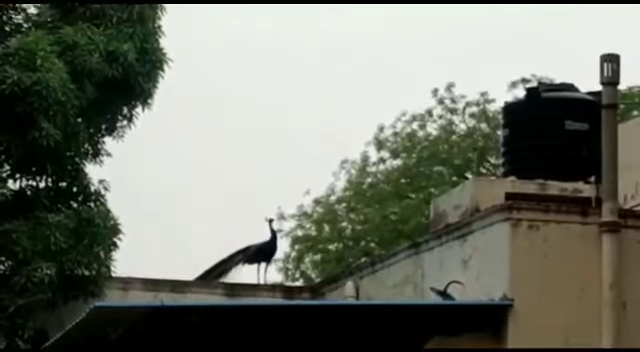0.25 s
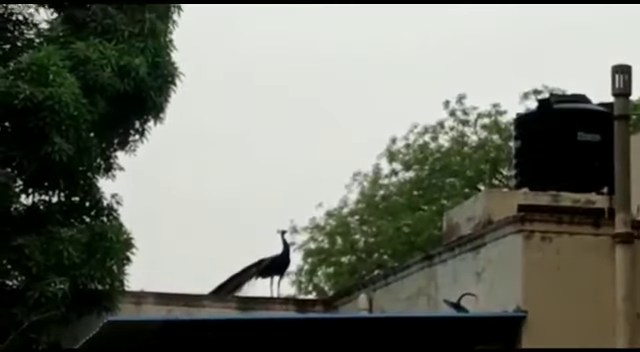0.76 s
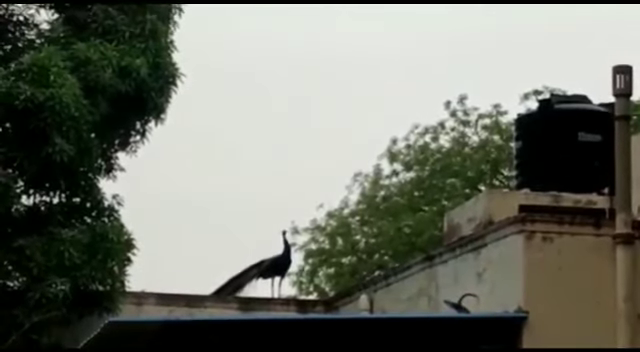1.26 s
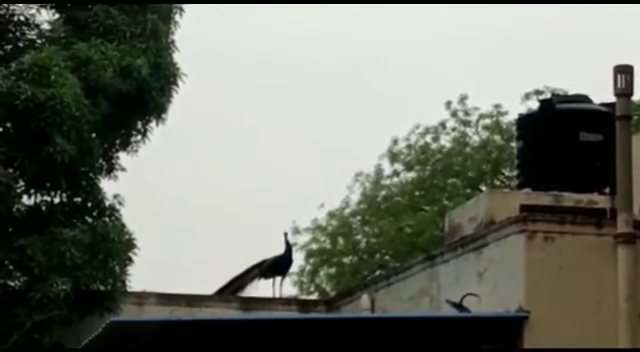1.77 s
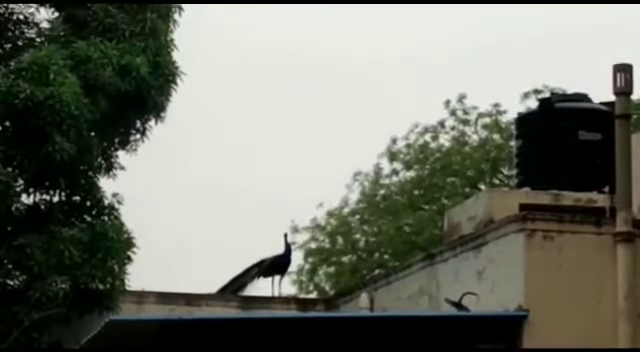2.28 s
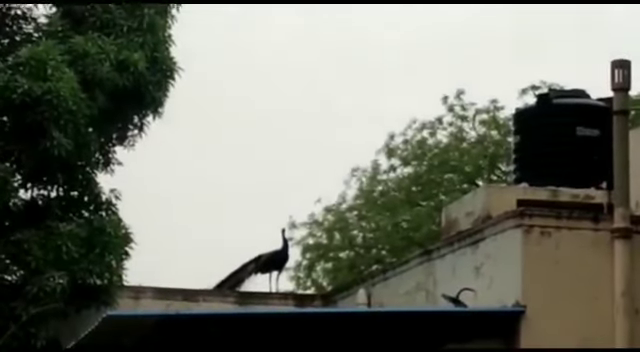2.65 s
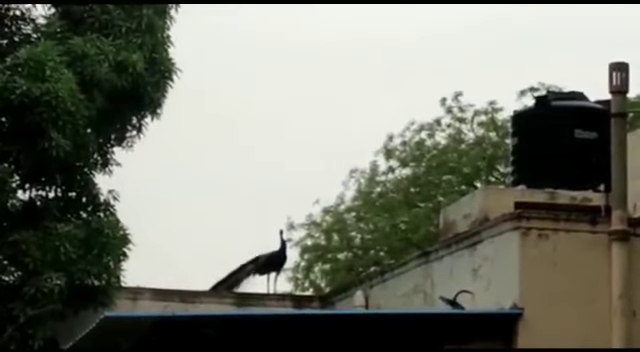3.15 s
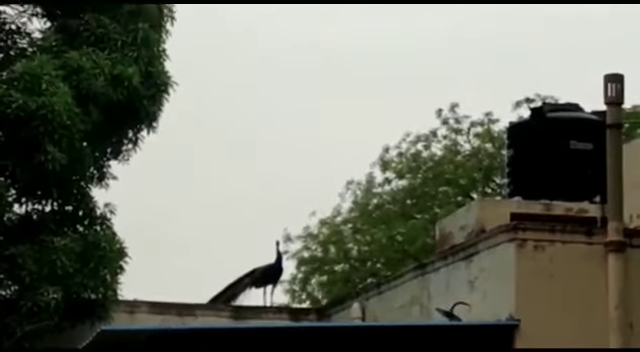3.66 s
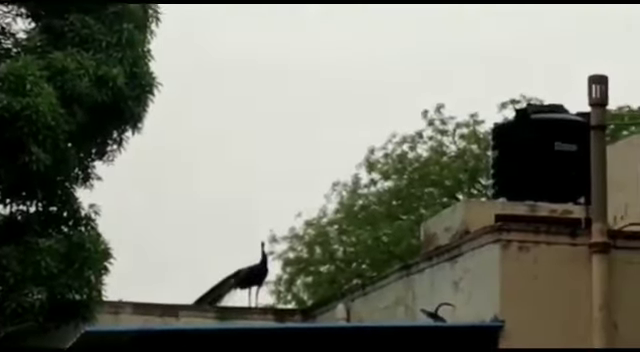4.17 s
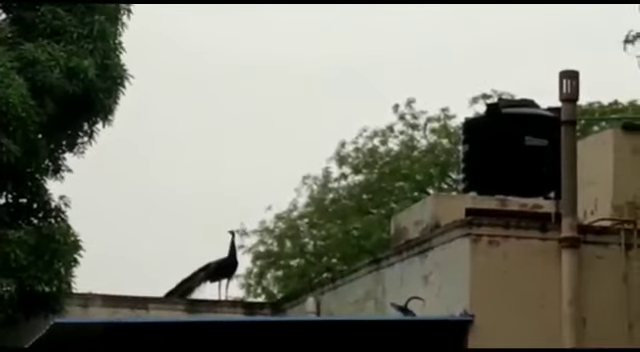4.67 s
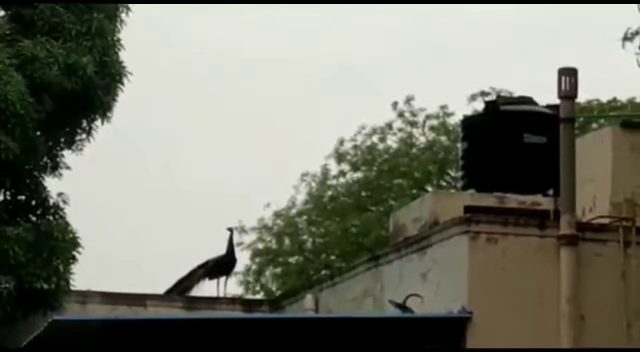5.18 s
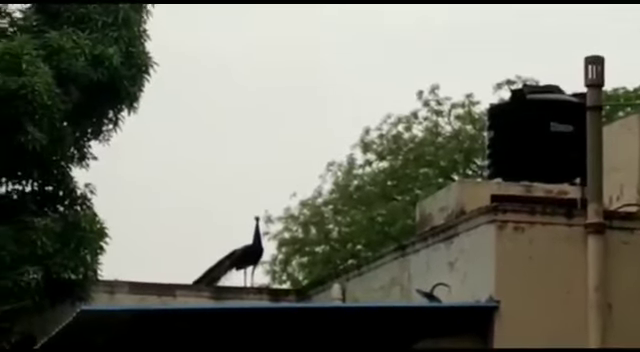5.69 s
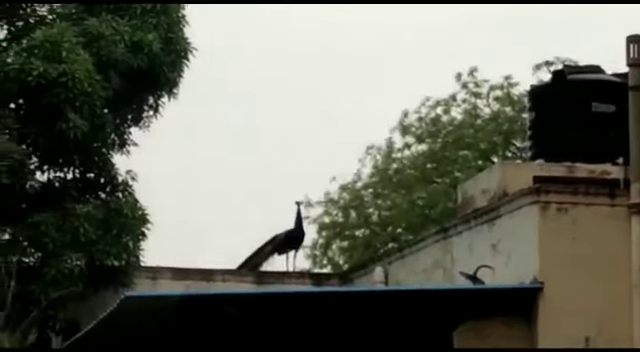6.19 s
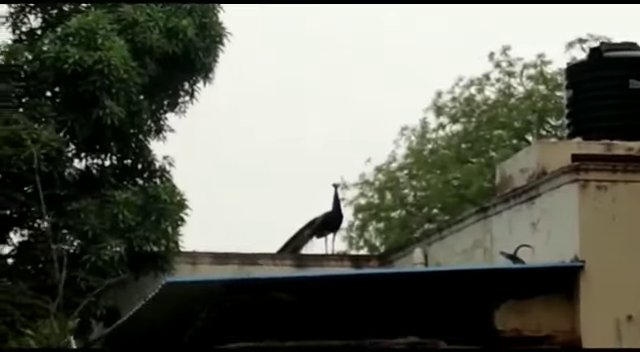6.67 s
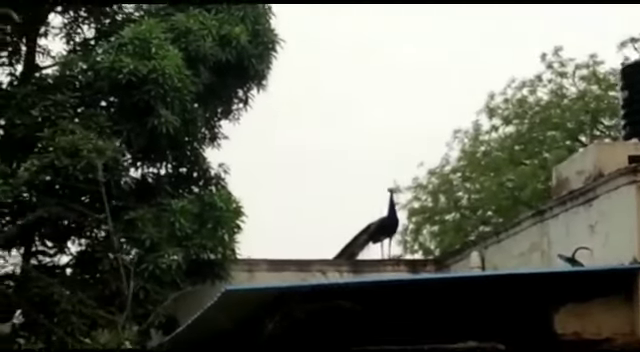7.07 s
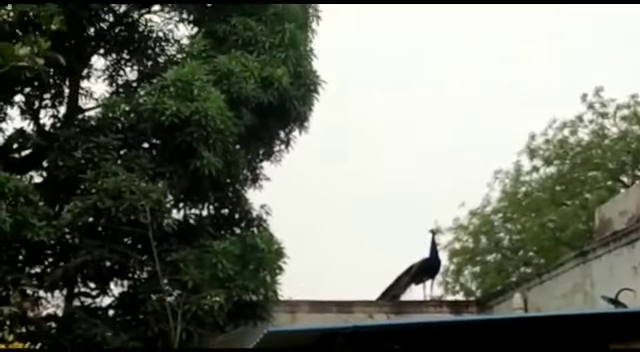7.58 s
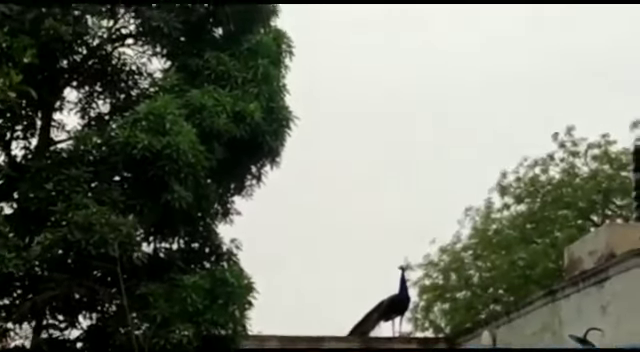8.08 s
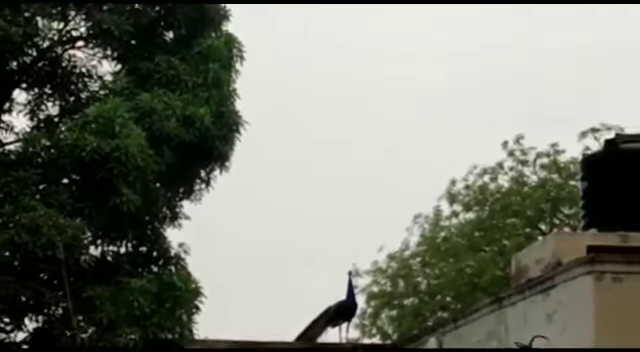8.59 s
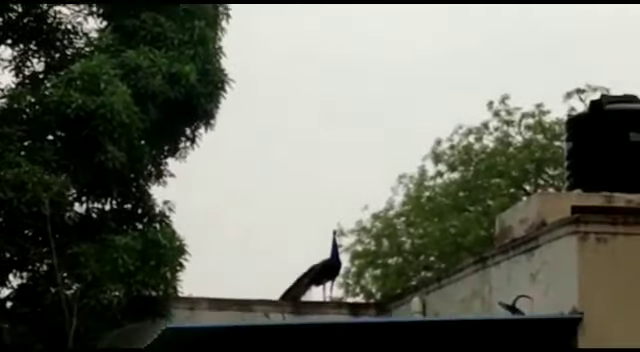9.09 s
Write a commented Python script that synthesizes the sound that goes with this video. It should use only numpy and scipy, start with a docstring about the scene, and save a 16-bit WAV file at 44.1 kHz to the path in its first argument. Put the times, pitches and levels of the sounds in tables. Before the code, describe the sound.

Nearby peafowl call in a walled yard with trees, and a peacock gives two loud arching cries, hoarse at the edges and brassy at their height. A parakeet-like bird squawks briefly in between. After about three seconds it grows much quieter: small birds chirp and whistle while distant peafowl answer faintly. The calls echo lightly off the walls, over a faint hiss and wavering hum.

```python
"""A yard with walls and trees. A peacock on a roof gives two loud arching cries: syrinx harmonics shaped
by the throat, hoarse when slack, brassy with effort. Other peafowl answer from near and far.
A parakeet-like bird squawks in between; small birds chirp and whistle in nearly pure tones.
Walls and foliage throw the calls back. Under them lie a faint hiss and a wavering hum,
with the hissy echo of a squawk dying away at the start, then soft rustles."""
import sys
import numpy as np
from scipy import signal
from scipy.fft import rfft, irfft, next_fast_len
from scipy.io import wavfile
from scipy.ndimage import uniform_filter1d

SR = 44100
rng = np.random.default_rng(int(sys.argv[2]) if len(sys.argv) > 2 else 0)


def transcribe(u):
    """Save the signal u as a 16-bit wav file named by the first command-line argument.

    u: samples, shape (n,) or (channels, n), limited to [-1, 1]; the rate is SR.
    q: integer samples, one column per channel.
    """
    v = np.clip(np.atleast_2d(u).T, -1, 1)
    q = np.round(v * 32767).astype(np.int16)
    wavfile.write(sys.argv[1], SR, q)


N = 411894
TIME = np.arange(N) / SR
CUTOFF_HZ = 15900

# Swell of the distant bird chorus. Each row: time in seconds, relative level in dB.
CHORUS_SWELL = [(3.6, -40.5), (3.76, -45.5), (4.78, -42), (5.15, -49.5), (6.08, -40.5), (7.64, -46),
                (8.8, -53), (9.34, -47.5)]
# Balance of hiss and echoes. Each row: frequency in Hz, left minus right in dB.
DIFFUSE_BALANCE = [(200, 1), (1400, -1.5), (2400, -5.5), (4200, -2), (6000, -9.5), (8300, -4.5), (10000, 0)]


def from_db(db):
    """Decibels to gain."""
    return 10 ** (np.asarray(db) / 20)


def unit_rms(x):
    """Scale to unit power."""
    return x / np.sqrt(np.mean(x ** 2) + 1e-20)


def at_hz(points, hz):
    """Read a table on a log-frequency axis."""
    points = np.array(points)
    return np.interp(np.log(np.maximum(hz, 1)), np.log(points[:, 0]), points[:, 1])


def pan(side_db):
    """Left and right gains for a level difference."""
    gains = from_db(np.array([[.5], [-.5]]) * side_db)
    return gains / np.sqrt(np.mean(gains ** 2, axis=0))


def colour(x, gain_at):
    """Filter by a frequency-dependent gain."""
    size = next_fast_len(x.shape[-1] + SR // 10)
    hz = np.arange(size // 2 + 1) * SR / size
    return irfft(rfft(x, size) * gain_at(hz), size)[..., :x.shape[-1]]


def drift(rate_hz, size):
    """Smooth random curve, spread about 1."""
    steps = np.arange(size) * rate_hz / SR
    return np.interp(steps, np.arange(size // 2 + 2), rng.standard_normal(size // 2 + 2))


def add(track, start_s, sound):
    """Mix a sound into a track."""
    i = round(start_s * SR)
    sound, i = sound[max(0, -i):], max(0, i)
    track[i:i + len(sound)] += sound[:max(0, N - i)]


def fade(size, edge_s):
    """Gate with soft ends."""
    i = np.arange(size)
    return np.sin(np.pi / 2 * np.minimum(1, np.minimum(i, size - i) / (edge_s * SR)))


def arch(length_s, start_hz, middle_hz, end_hz):
    """Pitch and swell of a note bending through three pitches."""
    u = np.linspace(0, 1, round(length_s * SR))
    pitch_hz = np.polyval(np.polyfit([0, .5, 1], [start_hz, middle_hz, end_hz], 2), u)
    return pitch_hz, np.sqrt(2 * np.abs(np.sin(np.pi * u)))


def mono_noise(spectrum, size):
    """Unit-power noise shaped by rows of Hz, dB."""
    return unit_rms(colour(rng.standard_normal(size), lambda hz: from_db(at_hz(spectrum, hz))))


def stereo_noise(gain_at):
    """Unit-power noise, alike in both ears in bass and top, diffuse in the middle."""
    # Each row: frequency in Hz, left-right coherence.
    coherence = [(100, 1), (300, 0.65), (640, 0.47), (1400, 0), (3100, 0), (6800, 0.79), (11000, 0.93)]
    mid, side = rng.standard_normal((2, N))
    mid = colour(mid, lambda hz: gain_at(hz) * np.sqrt(1 + at_hz(coherence, hz)))
    side = colour(side, lambda hz: gain_at(hz) * np.sqrt(1 - at_hz(coherence, hz)))
    return unit_rms(mid + side * [[1], [-1]])


def noise_band(centre_hz, width_hz):
    """Stereo noise in one resonance, falling steeply from an octave below it."""
    def resonance(hz):
        return np.minimum(1, 2 * hz / centre_hz) ** 2 / (1 + 2 * ((hz - centre_hz) / width_hz) ** 2)
    return stereo_noise(resonance)


def yard(x, scatter_db=-1.5, build_s=.00025):
    """A few wall echoes and a tail scattered by leaves."""
    # Each row: delay in seconds, left gain in dB, right gain in dB.
    walls = [(.013, -20, -17), (.029, -18, -14), (.047, -19, -15), (.071, -22, -18)]
    # Each row: frequency in Hz, time to fall 60 dB in seconds.
    t60 = [(500, 1.2), (1300, 0.94), (2300, 1.26), (5000, 1.3), (9000, 1), (15000, 1.0)]
    # Each row: frequency in Hz, gain in dB.
    echo_colour = [(500, 15), (1200, 12.5), (2400, 9), (4500, 6.5), (8000, 8), (10500, 7), (15000, -1)]
    t, edges_hz = TIME[:SR], np.geomspace(250, 16000, num=9)
    response = np.zeros((2, SR))
    for low, high in zip(edges_hz, edges_hz[1:]):
        bandpass = signal.butter(2, [low, high], "band", fs=SR, output="sos")
        band = signal.sosfilt(bandpass, rng.standard_normal((2, SR)))
        decay = np.exp(-np.log(1000) * t / at_hz(t60, np.sqrt(low * high))) * (1 - np.exp(-t / build_s))
        response += from_db(scatter_db) * band * decay / np.linalg.norm(decay)
    for delay_s, *sides_db in walls:
        response[[0, 1], round(delay_s * SR) + rng.integers(0, 20, 2)] += from_db(sides_db)
    echoes = signal.fftconvolve(x[None], response, axes=1)[:, :N]
    return colour(echoes, lambda hz: from_db(at_hz(echo_colour, hz)) * pan(at_hz(DIFFUSE_BALANCE, hz)))


def heard(x, direct_db, echo_db, side_db, left_lag_s=0):
    """A source by its straight path and by way of the yard."""
    # Each row: frequency in Hz, left minus right in dB.
    direct_balance = [(700, 0.5), (1350, 53), (2100, -0.5), (3400, -25.5), (5000, -2), (8300, -5),
                      (10500, 4.5), (13000, 8)]
    ears = np.array([np.interp(TIME - left_lag_s, TIME, x), x]) if left_lag_s else x
    direct = colour(ears, lambda hz: pan(at_hz(direct_balance, hz) + side_db))
    return from_db(direct_db) * direct + from_db(echo_db) * yard(x)


def background(air_db=-53.5, hum_hz=208.4, hum_db=-71, waver_db=2.2, swell_share=.43):
    """Outdoor hiss and hum; the treble swells and sinks with the far chorus."""
    # Each row: frequency in Hz, relative level in dB.
    air_spectrum = [(24, -58), (40, -36), (123, -20), (198, -5), (296, -9.5), (539, -15.5), (912, -14.5),
                    (1790, -7.5), (2480, -3), (3110, -12), (3800, -8.5), (5530, -10), (6420, -5.5),
                    (11100, -22.5), (15800, -23)]
    # Bands of hum and chorus. Each row: centre in Hz, width in Hz, level in dB, left minus right in dB.
    drones = [(201.5, 18, -71.5, -1.5), (573, 130, -66.5, 0.5), (2520, 195, -54.5, -9.5),
              (3820, 140, -62.5, -15), (5134, 240, -59.5, -5), (6434, 35, -63, -7)]
    air = stereo_noise(lambda hz: from_db(at_hz(air_spectrum, hz)) * pan(at_hz(DIFFUSE_BALANCE, hz)))
    out = from_db(air_db) * air
    for centre_hz, width_hz, db, side_db in drones:
        out += noise_band(centre_hz, width_hz) * pan(side_db) * from_db(db + waver_db * drift(11, N))
    out += from_db(hum_db) * np.sqrt(2) * np.sin(2 * np.pi * hum_hz * TIME)
    times_s, chorus_db = np.transpose(CHORUS_SWELL)
    swell = from_db(swell_share * np.interp(TIME, times_s, chorus_db - chorus_db.mean()))
    treble = colour(out, lambda hz: from_db(at_hz([(900, -15), (1900, -3), (9000, 4), (12000, -19)], hz)))
    return out + (swell - 1) * treble


def squawk_echo_and_rustles():
    """The hissy echo of a squawk dying away at the start, then soft rustles."""
    # Each row: start in seconds, length in seconds, centre in Hz, width in Hz, level in dB.
    swells = [(-.2, 0.45, 4260, 3300, -32.5), (0.52, 0.59, 342, 110, -61.5),
              (1.294, 0.41, 317.4, 123.5, -70.5), (6.67, 0.44, 404, 91.5, -68),
              (6.757, 0.26, 7650, 3500, -61.5)]   # the first row is the echo
    out = np.zeros((2, N))
    for start_s, length_s, centre_hz, width_hz, db in swells:
        u = np.clip((TIME - start_s) / length_s, 0, 1)
        out += noise_band(centre_hz, width_hz) * from_db(db) * np.sqrt(2 * np.abs(np.sin(np.pi * u)))
    return out


def pipe(pitch_hz, flutter, overtone_db=-27.5, flutter_hz=1200):
    """A small bird's nearly pure tone with fast pitch flutter."""
    phase = 2 * np.pi * np.cumsum(pitch_hz * (1 + flutter * drift(flutter_hz, len(pitch_hz)))) / SR
    return np.sqrt(2) * (np.sin(phase) + from_db(overtone_db) * np.sin(2 * phase))


def chatter(notes_per_s=19, base_db=-63, spread_db=12):
    """Distant small birds: brief scratchy glides at random, louder when the chorus swells."""
    out = np.zeros(N)
    times_s, chorus_db = np.transpose(CHORUS_SWELL)
    for when, height, span, bend, loud in rng.random((round(notes_per_s * N / SR), 5)):
        start_s, hz = when * N / SR, 2250 * 2 ** (1.15 * height)
        pitch_hz, swell = arch(.0192 + .0407 * span, hz, hz * (.88 + .2 * bend), hz * (.9 + .415 * bend))
        db = base_db + spread_db * loud + .5 * np.interp(start_s, times_s, chorus_db - chorus_db.mean())
        add(out, start_s, from_db(db) * swell * pipe(pitch_hz, flutter=.035))
    return out


def whistler(gain_db=3.5):
    """One low whistle that holds, lifts and drops."""
    # Each row: time in seconds, pitch in Hz, relative level in dB.
    contour = [(5.096, 1383, -66), (5.249, 1341, -68), (5.327, 1440, -56), (5.401, 1520, -68),
               (5.46, 1205, -57.5), (5.529, 1008, -69)]
    out = np.zeros(N)
    times_s, hz, db = np.transpose(contour)
    t = np.arange(times_s[0], times_s[-1], 1 / SR)
    tone = pipe(np.interp(t, times_s, hz), flutter=.003)
    add(out, times_s[0], from_db(np.interp(t, times_s, db) + gain_db) * tone * fade(len(t), .023))
    return out


def small_birds(gain_db=3.5, fall_db=4, quaver_db=4, quaver_hz=130):
    """Gliding chirps that speak quickly, quaver and die away."""
    # Each row: start in seconds, length in seconds, four successive pitches in Hz, relative level in dB.
    chirps = [(0.076, 0.053, 3450, 3300, 3050, 2840, -40), (0.324, 0.098, 3300, 3014, 2790, 2740, -42.5),
              (0.58, .08, 3070, 2940, 2727, 2660, -44), (.648, 0.043, 3970, 3580, 3260, 2900, -47),
              (3.046, 0.045, 2930, 2976, 2932, 3290, -54), (3.278, 0.14, 6260, 6080, 6150, 6320, -55.5),
              (3.668, 0.088, 6200, 6670, 6780, 6830, -54), (3.9, 0.11, 6340, 5670, 5150, 5030, -56),
              (3.959, 0.079, 5000, 4740, 4300, 4130, -46.5), (4.425, 0.053, 3810, 3684, 3740, 3680, -51),
              (4.509, 0.043, 4140, 4310, 4060, 4220, -47.5), (4.581, 0.069, 4500, 4150, 3800, 3600, -56),
              (4.744, 0.096, 4600, 4250, 4160, 4240, -51), (4.801, 0.051, 4140, 4030, 3790, 3390, -48),
              (5.56, 0.038, 3700, 3900, 3850, 3670, -57.5), (5.715, 0.054, 4000, 4090, 3960, 3890, -53.5),
              (5.77, 0.063, 2670, 2400, 2110, 1880, -57), (6.004, 0.066, 4700, 4480, 4200, 4060, -49.5),
              (6.065, 0.06, 3940, 3870, 3700, 3150, -49.5), (6.25, 0.045, 4730, 4420, 4150, 3940, -52),
              (6.24, 0.081, 2384, 2200, 1990, 1910, -66), (6.326, 0.062, 3556, 3694, 3770, 2860, -48.5),
              (6.41, 0.029, 2490, 2573, 2620, 2800, -48.5), (6.58, .06, 2296, 2480, 2600, 2550, -59.5),
              (6.762, 0.057, 4270, 4480, 4370, 2830, -48), (6.835, 0.039, 2633, 2560, 2530, 2430, -52),
              (7.085, 0.029, 2210, 2360, 2585, 2600, -53), (7.109, .018, 2540, 2650, 2700, 2780, -47),
              (7.255, 0.051, 2360, 2490, 2300, 2020, -58), (7.272, 0.035, 4880, 4550, 4220, 3790, -49.5),
              (7.412, 0.045, 2630, 2655, 2660, 2660, -48), (7.515, 0.047, 2400, 2190, 2180, 1950, -57.5),
              (7.598, 0.054, 10240, 9850, 10150, 9700, -55), (7.616, 0.052, 4000, 3900, 3740, 3480, -57.5),
              (7.651, 0.09, 2395, 2477, 2517, 2530, -52.5), (7.785, 0.037, 2070, 2214, 2210, 2180, -56),
              (7.924, 0.034, 4000, 3840, 3750, 3570, -56.5), (7.966, 0.032, 3240, 3195, 3320, 3240, -52.5),
              (8.018, 0.03, 3100, 3090, 3130, 3080, -54.5), (8.069, .06, 3150, 3220, 3140, 3050, -62),
              (8.385, 0.086, 4700, 4260, 4210, 3670, -49.5), (8.475, 0.026, 4170, 4020, 3550, 3100, -47),
              (8.567, 0.094, 4400, 4200, 4080, 4100, -64), (8.75, 0.09, 1890, 1875, 1976, 1990, -64.5),
              (8.84, 0.096, 3850, 3690, 3530, 3510, -55.5), (8.893, 0.15, 3930, 4230, 4600, 5240, -57.5),
              (9.119, 0.072, 5140, 4720, 4220, 3780, -48.5), (9.201, 0.05, 3050, 3060, 3210, 3370, -52.5),
              (9.243, 0.044, 3320, 3680, 3780, 3960, -49)]
    out = np.zeros(N)
    for start_s, length_s, *bends_hz, db in chirps:
        u = np.linspace(0, 1, round(length_s * SR))
        pitch_hz = uniform_filter1d(np.interp(u, np.linspace(0, 1, num=4), bends_hz), size=250)
        shape_db = fall_db * (.5 - u) + quaver_db * drift(quaver_hz, len(u))
        envelope = from_db(db + gain_db + shape_db) * fade(len(u), edge_s=.005)
        add(out, start_s, envelope * pipe(pitch_hz, flutter=.02))
    return out


def syrinx(pitch_hz, throat, jitter, jitter_hz, harmonics, lift_db):
    """Harmonics of a slightly unsteady membrane, shaped by the throat and by lift_db(hz)."""
    phase = 2 * np.pi * np.cumsum(pitch_hz * (1 + jitter * drift(jitter_hz, len(pitch_hz)))) / SR
    out = np.zeros(len(pitch_hz))
    for k in range(1, harmonics + 1):
        hz = k * pitch_hz
        gain = (hz < CUTOFF_HZ) * from_db(at_hz(throat, hz) + lift_db(hz))
        out += gain * np.sin(k * phase + rng.uniform(0, 2 * np.pi))
    return np.sqrt(2) * out


def squawks(gain_db=13.5, hiss_db=-8, harshen_db_per_oct=10.5, rattle_db=3, rattle_hz=140):
    """Each squawk shoots up, sags and drops off, growing harsher; held ones rattle and hiss most."""
    # Each row: start in seconds, length in seconds, top pitch in Hz, relative level in dB,
    # hold from 0 to 1, brightness in dB per octave.
    calls = [(0.13, 0.11, 2322, -42, 0.8, 5.5), (0.419, 0.105, 2337, -42, 0.98, 5.5),
             (1.192, 0.093, 2312, -44, 0.2, -2), (1.451, 0.094, 2263, -44.5, 0.35, 1.5),
             (1.734, 0.083, 2260, -47.5, 0.13, 2), (1.998, 0.092, 2180, -48.5, 0.27, 0.5),
             (3.132, 0.11, 2292, -56.5, 0, 0.5), (3.417, 0.11, 2247, -54.5, 0.03, 2.5),
             (4.05, 0.12, 2290, -64.5, 0.15, -1)]
    # Each row: share of the length, then short and held pitch as shares of the top.
    contour = [(0, .58, .65), (.16, .91, 0.84), (0.281, 1.02, 1.02), (.4, .92, 1), (0.538, 0.8, .97),
               (.7, .68, .9), (.87, .65, .8), (0.998, 0.43, .62)]
    # Spectra of voice and hiss. Each row: frequency in Hz, gain in dB.
    throat = [(1400, 0), (2200, 8), (3000, 8), (4200, 13), (5500, 5.5), (7000, 3.5), (8800, -3),
              (10000, -14), (15000, -28)]
    hiss_spectrum = [(300, -52), (1500, -12), (2600, -1), (4300, 4), (8500, -20), (10500, -9), (15500, -16)]
    out = np.zeros(N)
    when, short, held = np.transpose(contour)
    for start_s, length_s, top_hz, db, hold, brightness in calls:
        u = np.linspace(0, 1, round(length_s * SR))
        pitch_hz = top_hz * uniform_filter1d(np.interp(u, when, short + hold * (held - short)), size=500)
        jitter = np.interp(u * u, [0, 1], [.016, .026]) * (1 + hold)
        tilt_db_per_oct = brightness + harshen_db_per_oct * (u - .5)
        voice = syrinx(pitch_hz, throat, jitter, jitter_hz=1500, harmonics=8,
                       lift_db=lambda hz: tilt_db_per_oct * np.log2(np.minimum(hz, 9000) / 4000))
        hiss = max(hold, .19) * from_db(hiss_db) * np.sqrt(2 * u) * mono_noise(hiss_spectrum, len(u))
        rattle = from_db(rattle_db * np.sqrt(hold) * drift(rattle_hz, len(u)))
        swell = np.sqrt(np.minimum(1, u / .35)) * fade(len(u), edge_s=.012)
        add(out, start_s, from_db(db + gain_db) * swell * rattle * (unit_rms(voice) + hiss))
    return out


def peafowl(calls, throat, start_share, end_share, jitter, harmonics, gain_db=-1, mellow_db_per_oct=9):
    """Arching notes that start and end below their top pitch, brassy only at their height."""
    out = np.zeros(N)
    for start_s, length_s, top_hz, db in calls:
        pitch_hz, swell = arch(length_s, start_share * top_hz, top_hz, end_share * top_hz)
        tilt_db_per_oct = mellow_db_per_oct * (swell ** 2 - 2)
        voice = syrinx(pitch_hz, throat, jitter, jitter_hz=397.3, harmonics=harmonics,
                       lift_db=lambda hz: tilt_db_per_oct * np.log2(np.maximum(hz / 3000, 1)))
        add(out, start_s, from_db(db + gain_db) * swell * voice)
    return out


def far_peafowl():
    """Faint, dull answers from far away."""
    # Each row: start in seconds, length in seconds, top pitch in Hz, relative level in dB.
    calls = [(3.55, 0.39, 639, -78), (4.25, 0.24, 575, -73.5), (4.9, 0.21, 564, -74.5),
             (5.26, 0.45, 579.3, -70), (5.85, 0.41, 546, -76.5), (6.6, 0.43, 637, -73),
             (6.97, .41, 615, -73.5), (7.63, 0.24, 568, -74.5), (8.1, 0.43, 801, -73.5),
             (8.66, 0.44, 614, -75.5)]
    # Each row: frequency in Hz, gain in dB.
    throat = [(500, 0), (800, 0), (1100, -12), (1650, -5), (2400, -2), (3200, -12)]
    return peafowl(calls, throat, start_share=.92, end_share=.77, jitter=.0021, harmonics=5)


def rival_peafowl():
    """Bright calls from rivals close by."""
    # Each row: start in seconds, length in seconds, top pitch in Hz, relative level in dB.
    calls = [(-.3, 0.43, 726, -35.5), (.25, 0.4, 740, -35.5), (.72, .62, 747, -36),
             (1.55, 0.49, 741.2, -33)]
    # Each row: frequency in Hz, gain in dB.
    throat = [(700, -22.5), (1450, -22), (2000, -13.5), (2230, -3), (2900, -13.5), (4400, -17), (7000, -17),
              (12000, -28), (15500, -33)]
    return peafowl(calls, throat, start_share=.81, end_share=.9, jitter=.004, harmonics=21)


def roof_db(hz, delay_s=.001575, strength=.6):
    """The roof's reflection makes gliding harmonics swell and fade; the treble is scattered instead."""
    reflected = strength * np.interp(hz, [6000, 10000], [1, 0])
    return 20 * np.log10(np.abs(1 + reflected * np.exp(-2j * np.pi * hz * delay_s)))


def peacock(brassy_effort=.55, slack_db_per_oct=-13, wobble=.003, waver_db=1.5, waver_hz=60):
    """Effort builds and ebbs: each cry opens from dull and hoarse to clean and brassy, then darkens."""
    # Each row: time in seconds, pitch in Hz, voice gain in dB, effort from 0 to 1, hiss level in dB.
    first_cry = [(.71, 770, -35, 0.13, -46), (.755, 813, -33, .27, -41.5), (.805, 863, -39, 0, -43.5),
                 (0.852, 919, -28, 0.52, -37.5), (.9, 911, -26.5, .38, -35), (.95, 898.7, -28, 0.36, -37),
                 (1.002, 873, -26, 0.49, -38), (1.05, 866, -28, 0.6, -43), (1.101, 839, -34.5, .72, -31),
                 (1.15, 819.4, -29.5, 0.52, -33.5), (1.2, 786.5, -31, 0.2, -30),
                 (1.24, 769.6, -31.5, 0.19, -31.5), (1.292, 744, -36, 0.3, -38),
                 (1.38, 697, -47, 0.08, -52)]
    second_cry = [(2.074, 545, -24, 0, -64), (2.1, 558, -25, 0, -55), (2.139, 593, -22.5, 0, -43.5),
                  (2.18, 625.6, -24, 0.3, -38), (2.21, 644, -21.5, 0.42, -46),
                  (2.255, 659.4, -25.5, 0.56, -43), (2.3, 673, -25, 0.7, -50),
                  (2.357, 683.3, -26, 0.78, -58), (2.44, 686, -27, 0.92, -63),
                  (2.518, 683.3, -24.5, 0.8, -58), (2.56, 672.7, -25.5, .66, -40),
                  (2.6, 649, -21.5, 0.34, -40), (2.64, 623.7, -23.5, 0.41, -43),
                  (2.69, 601.5, -22, 0.24, -38), (2.74, 575.4, -22, 0.39, -40.5),
                  (2.775, 537.4, -28, 0.092, -40), (2.809, 512, -39, 0.089, -41.5), (2.9, 480, -60, 0, -47)]
    # Each row: effort from 0 to 1, factor on jitter, wobble and waver.
    hoarseness = [(0, 1.6), (.35, 1.2), (.55, .45), (.7, .15), (.9, .04)]
    # Spectra. Each row: frequency in Hz, gain in dB.
    throat = [(550, -27), (690, -23), (880, -12.5), (1100, -14.5), (1300, -16.5), (1400, -6.5), (1700, -7),
              (1820, -14.5), (1900, -16.5), (2040, 3.5), (2290, 3), (2400, -8.5), (2570, -2.5), (2700, -7),
              (2800, -13), (3100, -11), (3750, -23.5), (4430, -16), (5000, -21.5), (6300, -16.5),
              (8000, -22.5), (10000, -33.5), (14000, -28)]   # sharp resonances at 2 to 2.6 kHz
    brass = [(2700, -2), (3420, 20.5), (4100, 32.5), (4300, -28), (4790, 24), (5470, 14), (6150, 14),
             (6840, 7), (8000, 13.5), (10000, 6), (14000, 5.5)]   # added at full effort
    head_tints = ([(900, 0), (1750, -3), (2550, 4.5), (2680, 3.5), (2750, 0), (3400, 6.5), (4300, -2.5),
                  (5300, 5.5), (7000, 3.5), (12000, 14.5)], [(2600, -1), (3400, -3), (4600, 0.5), (6000, 1),
                  (8000, -5.5), (12000, 6.5)])   # one per cry, from the way the head is turned
    hiss_spectrum = [(2000, -51), (3500, -3), (5500, 0), (8000, 1), (10000, -14), (13500, -6.5),
                     (15500, -14.5)]
    out = np.zeros(N)
    for cry, jitter, tint in zip((first_cry, second_cry), (.011, .0035), head_tints):
        times_s, *controls = np.transpose(cry)
        t = np.arange(times_s[0], times_s[-1], 1 / SR)
        pitch_hz, voice_db, effort, hiss_db = (
            uniform_filter1d(np.interp(t, times_s, control), size=900) for control in controls)
        hoarse = np.interp(effort, *np.transpose(hoarseness))
        brassiness = np.interp(effort, [brassy_effort, 1], [0, 1])
        corner_hz = 1320 * 2 ** (4.6 * effort)   # a slack voice loses the overtones above this

        def lift_db(hz):
            slack_db = slack_db_per_oct * np.log2(np.maximum(hz / corner_hz, 1))
            return roof_db(hz) + at_hz(tint, hz) + brassiness * at_hz(brass, hz) + slack_db

        pitch_hz *= 1 + wobble * hoarse * drift(waver_hz, len(t))
        voice = syrinx(pitch_hz, throat, jitter * hoarse, jitter_hz=700, harmonics=26, lift_db=lift_db)
        voice *= from_db(voice_db + waver_db * hoarse * drift(waver_hz, len(t)))
        hiss = mono_noise(hiss_spectrum, len(t)) * from_db(hiss_db)
        add(out, times_s[0], (voice + hiss) * fade(len(t), edge_s=.025))
    return out


def scene():
    """The peacock, its neighbours and the small birds over the background."""
    rivals, far = rival_peafowl(), far_peafowl()
    birds = small_birds() + whistler()
    return (heard(peacock(), direct_db=1.5, echo_db=-12, side_db=-1)
            + heard(rivals, direct_db=1.5, echo_db=-5, side_db=-4)
            + heard(far, direct_db=6, echo_db=-6, side_db=-1)
            + heard(squawks(), direct_db=3, echo_db=-4.5, side_db=-4, left_lag_s=.00034)
            + heard(birds, direct_db=4, echo_db=-6.5, side_db=-2, left_lag_s=.00034)
            + heard(chatter(), direct_db=-6, echo_db=-3, side_db=-3, left_lag_s=.00034)
            + background() + squawk_echo_and_rustles())


def record(dry, low_cut_hz=60):
    """The microphone loses the bass; the top is cut steeply."""
    thin = signal.sosfilt(signal.butter(1, low_cut_hz, "high", fs=SR, output="sos"), dry)
    return signal.sosfilt(signal.ellip(12, .1, 80, CUTOFF_HZ, fs=SR, output="sos"), thin)


dry = scene()
out = record(dry)
transcribe(out)
```